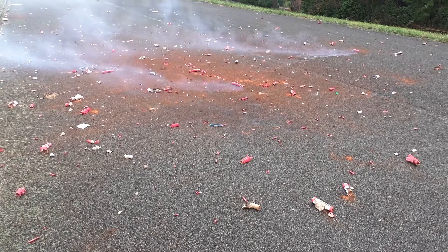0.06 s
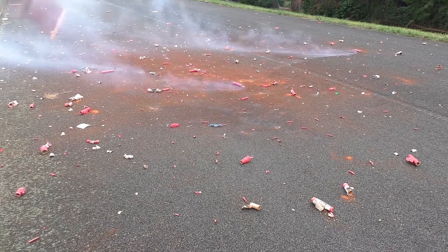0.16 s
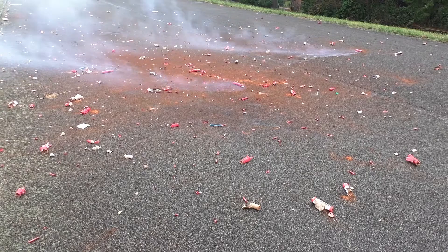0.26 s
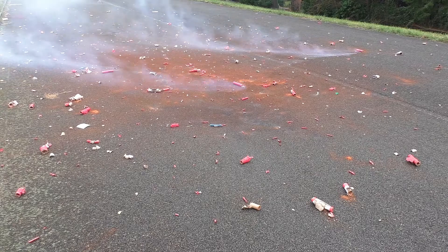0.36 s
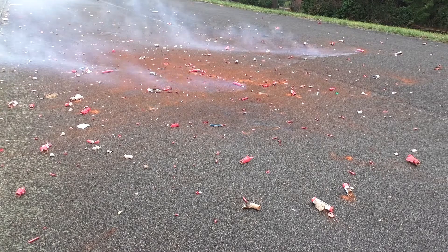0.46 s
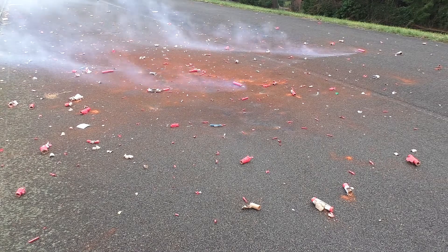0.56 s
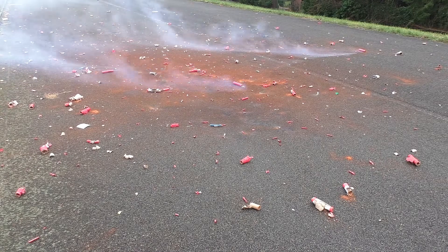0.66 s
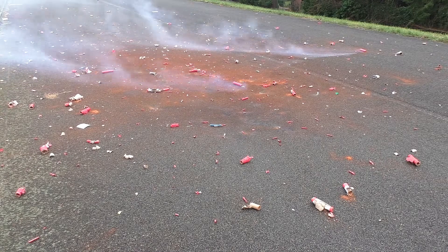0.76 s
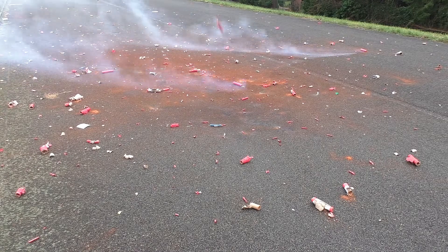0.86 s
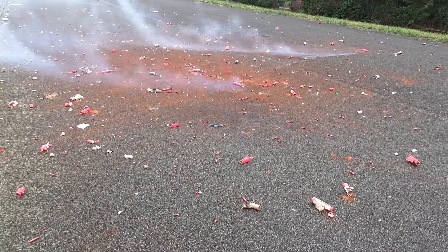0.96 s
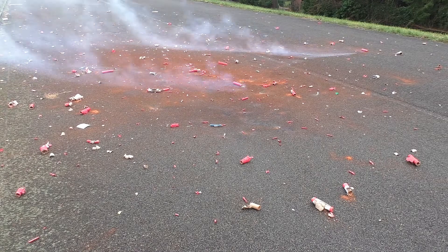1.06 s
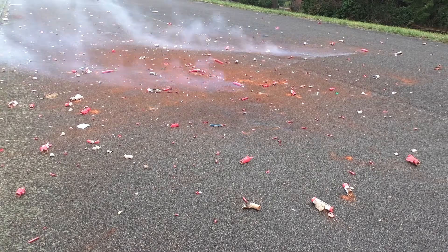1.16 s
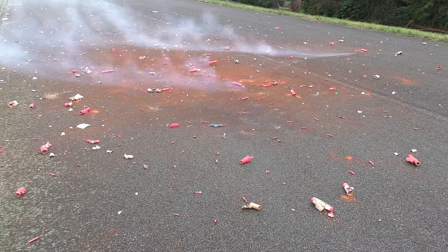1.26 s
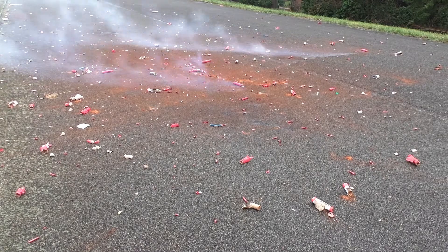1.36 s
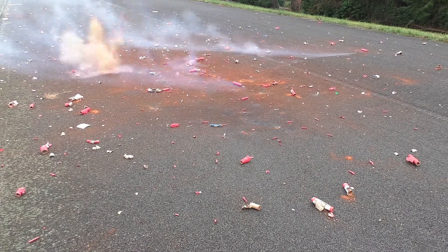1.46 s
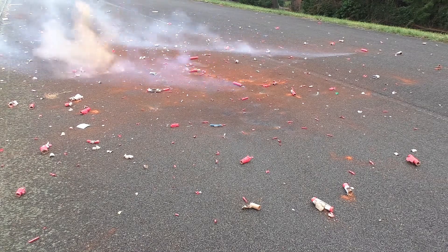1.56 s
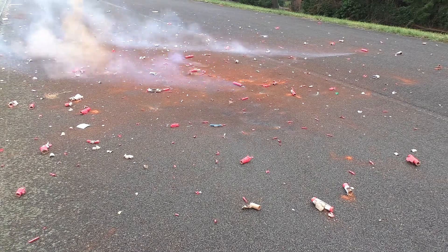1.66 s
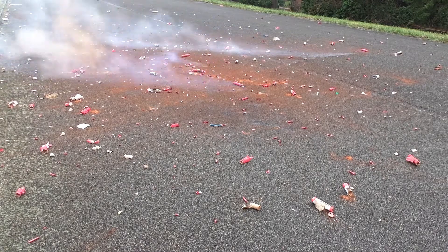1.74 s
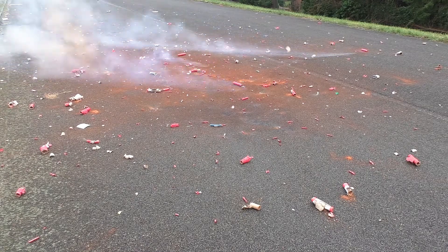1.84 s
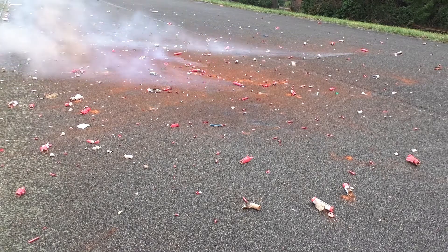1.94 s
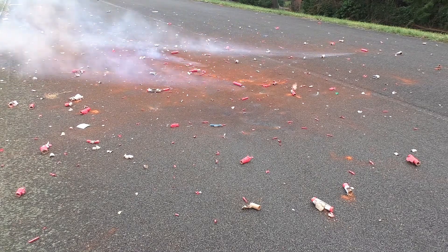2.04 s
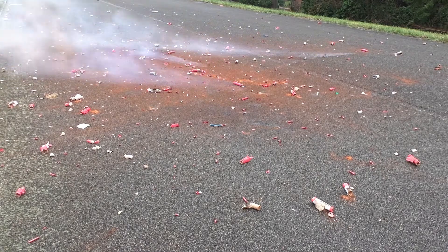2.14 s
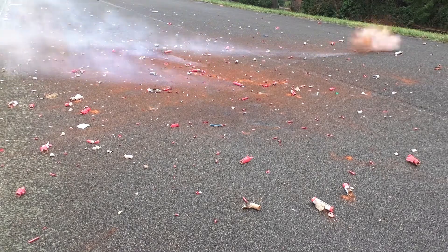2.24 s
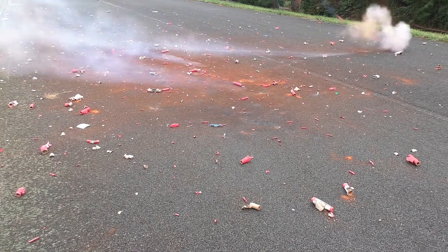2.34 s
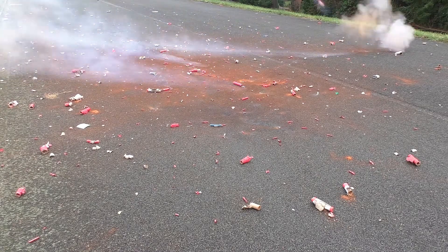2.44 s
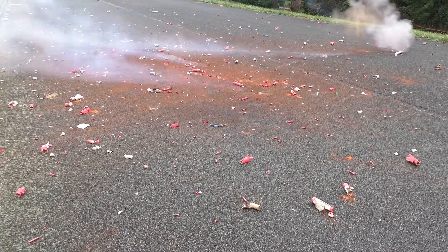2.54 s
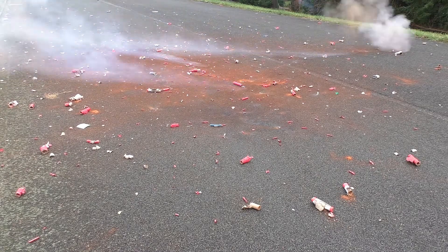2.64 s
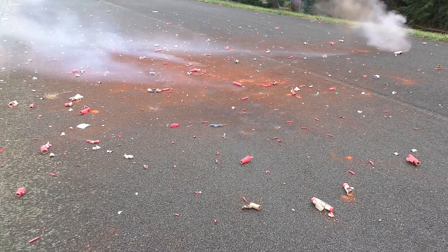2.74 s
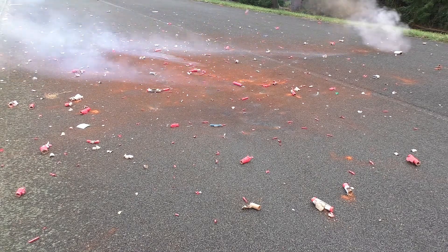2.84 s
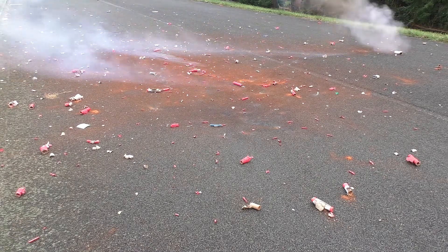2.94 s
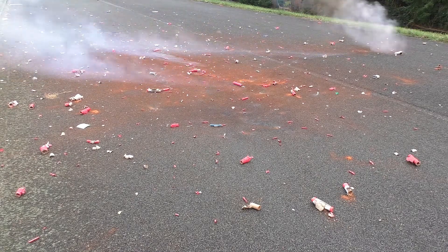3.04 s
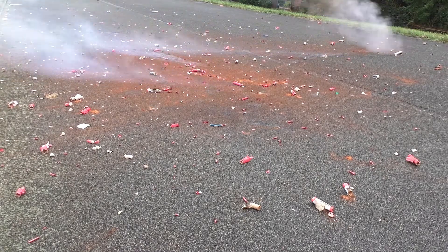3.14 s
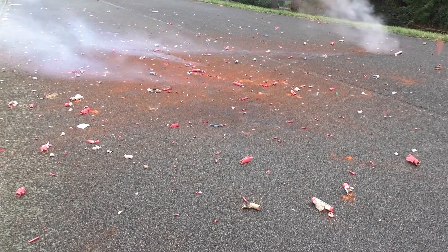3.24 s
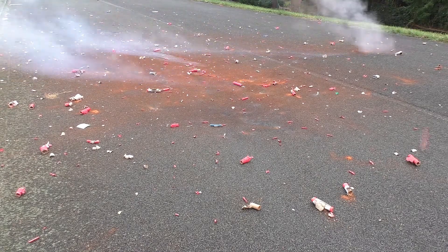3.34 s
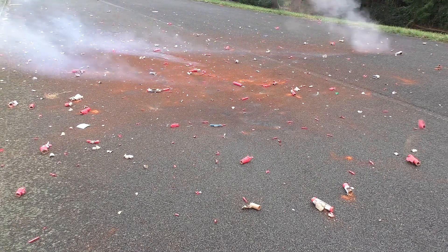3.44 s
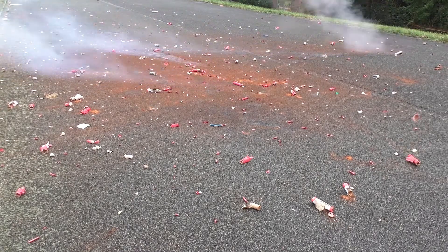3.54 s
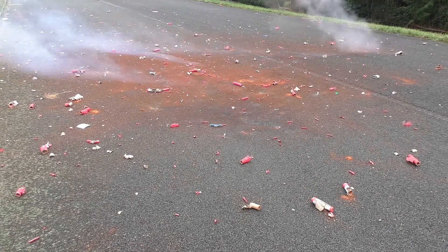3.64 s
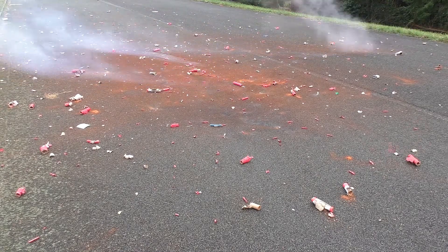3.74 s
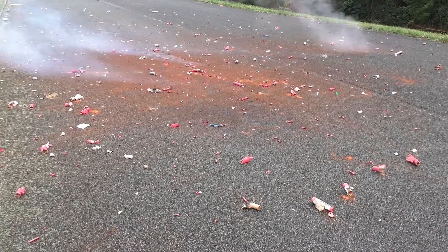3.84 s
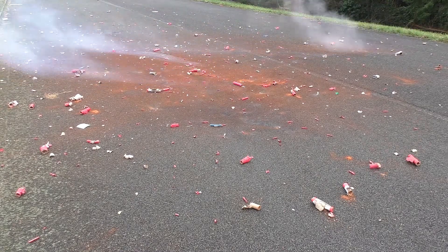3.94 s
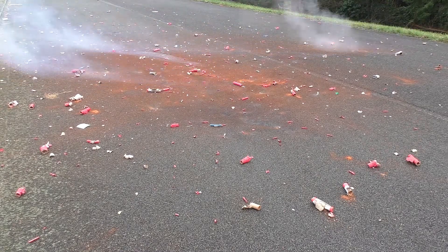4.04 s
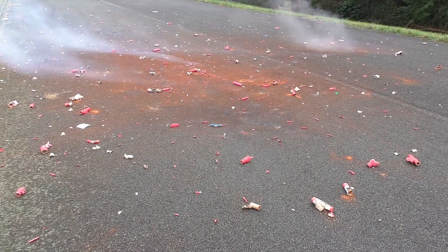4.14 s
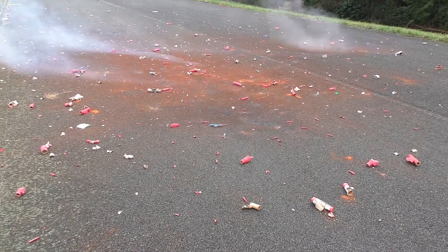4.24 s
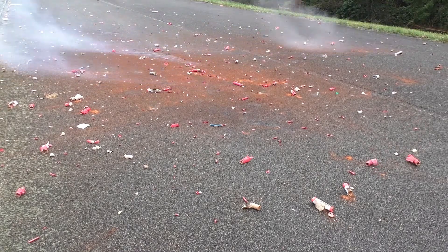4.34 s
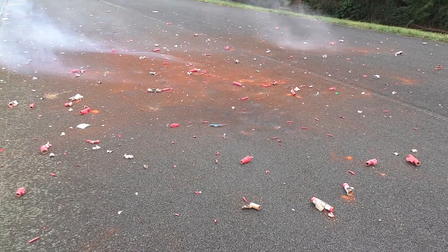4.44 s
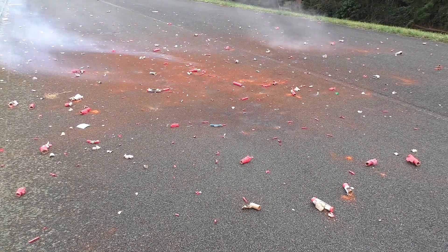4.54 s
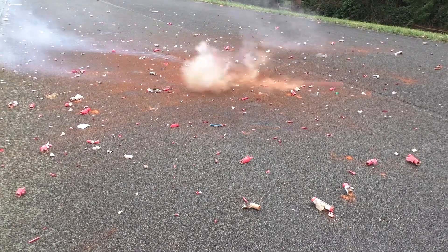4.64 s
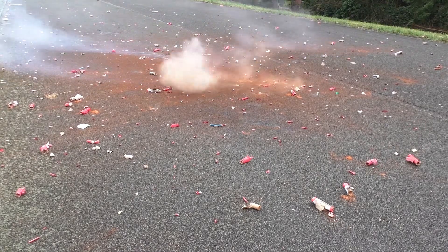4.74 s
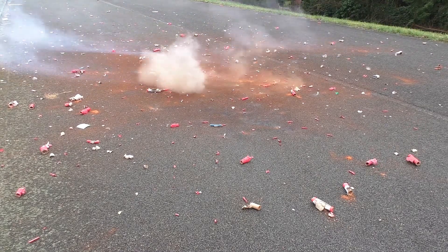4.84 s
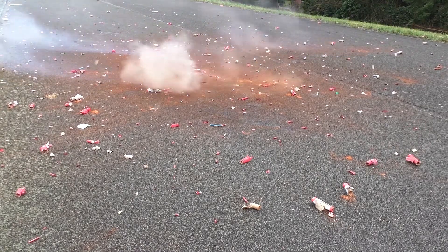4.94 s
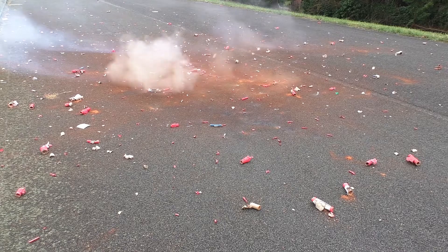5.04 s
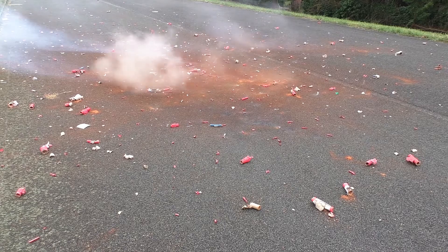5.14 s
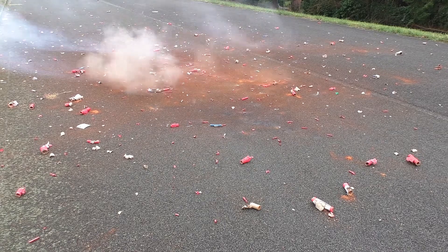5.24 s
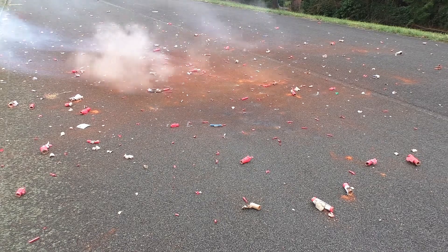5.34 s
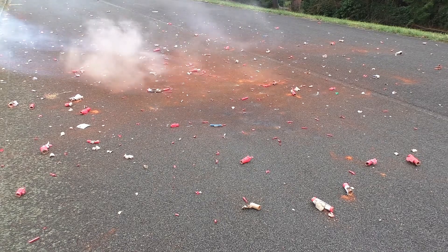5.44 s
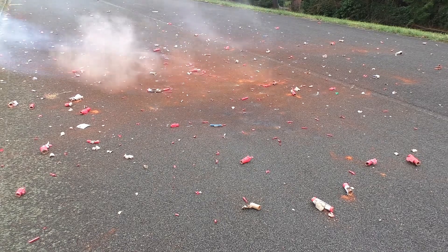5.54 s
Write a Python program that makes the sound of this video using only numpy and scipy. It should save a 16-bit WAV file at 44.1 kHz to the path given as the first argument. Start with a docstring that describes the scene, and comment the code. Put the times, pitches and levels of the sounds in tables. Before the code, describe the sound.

On an open paved lot, a fuse hisses airily with a whistling papery tone, sputtering and fading. Close to a stereo microphone, three firecrackers explode at about 1.4, 2.3 and 4.6 seconds, overloading it. Trees and walls return slaps and a rolling echo. Casing scraps tick on asphalt, and steady distant traffic dips after each bang.

```python
"""Three firecrackers on an open asphalt lot

Three shock fronts go off 5 to 8 m from a pair of microphones and overload them; trees and walls throw each back.
Burning fuses are jets of noise that also ring their paper tubes; pops and falling scraps are clicks with a rattle.
Steady distant traffic is filtered noise; the gain drops at every overload, so the traffic ducks and creeps back.
"""
import sys
import numpy as np
from scipy import signal
from scipy.fft import rfft, irfft, next_fast_len
from scipy.io import wavfile
from scipy.ndimage import map_coordinates

SR = 44100
rng = np.random.default_rng(int(sys.argv[2]) if len(sys.argv) > 2 else 0)


def to_wav(sig):
    """Store sig (one row per channel, or 1-D mono) as 16-bit WAV at the path in sys.argv[1].

    Samples outside -1..1 are clipped; the rate is SR.
    """
    pcm = np.clip(np.atleast_2d(sig), -1, 1) * 32767
    pcm = np.round(pcm).astype(np.int16)
    wavfile.write(sys.argv[1], SR, pcm.T)  # frames by channels


N = 246254  # samples

# The bangs: (time [s], shock level [dB], ground scatter level [dB], microphone swing level [dB],
# swing left over right [dB], echo level [dB], delay of the trees [s])
BANG_EVENTS = [(1.4178, 13.5, -4.5, -2, 16.5, -16.5, 0.11), (2.2527, 16, -1.5, 11, -6.5, -12, 0.09),
               (4.5812, 14, -5, 17, 5.5, -17, 0.1)]
# Spectrum of far, dull reflections: (frequency [Hz], relative density [dB per Hz])
FAR_SPECTRUM = [(40, -5.5), (200, -2.5), (800, 1.5), (1400, -2), (3000, -9), (6000, -20.5), (15000, -47)]


def firecrackers():
    """Each bang radiates a blast, swings the microphones and draws an answer from the trees."""
    out = np.zeros((2, N))
    t = np.arange(SR * 3 // 2) / SR
    for s, shock_db, ground_db, swing_db, lean_db, echo_db, delay in BANG_EVENTS:
        bang = blast(t, shock_db, ground_db)
        overload = amp(swing_db) * pan(lean_db) * swing(t)
        echo = amp(echo_db) * trees(t, delay)
        add(out, s, bang + overload + echo)
    return out


def blast(t, shock_db, ground_db):
    """A shock front, the roar of the bursting tube, then scatter from the asphalt."""
    # spectra: (frequency [Hz], relative density [dB per Hz])
    burst_spectrum = [(40, -2.5), (140, 5), (270, -9.5), (420, -4), (600, -1.5), (1000, 0), (1600, -5.5),
                      (3000, -14), (6000, -19.5), (15000, -30)]
    ground_spectrum = [(40, 4.5), (150, -17.5), (500, -3.5), (900, 1), (1300, -6.5), (2000, -18),
                       (4000, -21.5), (8000, -23), (15000, -30.5)]
    u = t / 0.00053  # pressure turns negative after 0.53 ms
    front = 3.03 * (1 - u) * np.exp(-u)
    # each decays by 60 dB in the time given
    burst = coloured(noise(len(t), width=0.69), burst_spectrum) * amp(-60 * t / 0.057)
    ground = coloured(noise(len(t), width=0.51), ground_spectrum) * amp(-60 * t / 0.23)
    return amp(shock_db) * (front + burst) + amp(ground_db) * ground


def swing(t):
    """The overloaded microphones swing back to rest, each lobe longer and weaker than the last."""
    # still for 6.2 ms, then each lobe ends 2.67 times as late as the one before
    lobes = np.log(np.maximum(t / .0062, 1)) / np.log(2.67)
    decay = np.exp(-(t / 0.35) ** 4) / (1 + (t / 0.015) ** 1.44)
    return -np.sin(np.pi * lobes) * decay


def trees(t, delay):
    """The tree line answers in a crackling swell, and the wood behind it in a long dull roll."""
    # near spectrum: (frequency [Hz], relative density [dB per Hz])
    near_spectrum = [(40, -8.5), (150, -1.5), (420, 0.5), (1000, 4.5), (1600, -3.5), (3000, -6),
                     (6000, -11), (10000, -19), (15000, -32)]
    late = np.maximum(t - delay, 0)
    u = late / 0.052
    swell = u ** 3 * np.exp(3 * (1 - u))
    # the nearest bushes answer first, faintly
    edge = .36 * (1 - np.exp(-late / .006)) * amp(-60 * late / .33)
    crackle = scatter(len(t), rate=350, spread_db=5, width=0.48, dull_hz=3120)
    near = (swell + edge) * coloured(crackle, near_spectrum)
    roll = (1 - np.exp(-u)) * amp(-60 * late / 1.7)
    depths = scatter(len(t), rate=450, spread_db=17, width=0.99, dull_hz=2200)
    far = roll * coloured(depths, FAR_SPECTRUM)
    return near + amp(-12.0) * far


def scatter(size, rate, spread_db, width, dull_hz):
    """Dull reflections from single trunks, on average rate a second, over a wash from the leaves."""
    trunks = (rng.random(size) < rate / SR) * rng.uniform(-1, 1, size)
    sides = amp(spread_db * (rng.random((2, size)) - .5))
    knocks = filtered(unit(trunks * sides), lambda hz: 1 / (1 + (hz / dull_hz) ** 2))
    leaves = noise(size, width) * clumps(size, rate=150, depth_db=3.5)
    return knocks + 0.83 * leaves


def slaps():
    """Walls and trunks around the lot return every bang, late by the detour that the sound takes."""
    # (distance [m], bearing to the right [degrees], level before the common offset [dB re echo],
    # gain per metre that the bang lies to the right [dB/m], pitch [Hz], left over right [dB])
    reflectors = [(22.43, 116, 3, 2, 465, -11), (31.31, -24, 12.5, -.7, 1200, -1.5),
                  (33.92, -45, 8, 0, 850, -4), (48.89, -6, 8.5, 1.1, 890, -10),
                  (73.98, -33, -1, -.9, 930, 1), (80.86, -47, -12, 1.5, 930, -3),
                  (97.4, -20, -16, 1, 1000, -11)]
    # where each bang lies, from the microphones: (to the right [m], ahead [m])
    bang_places = [(-2.73, 4.41), (2.41, 7.21), (1.35, 4.98)]
    sound_m_per_s, offset_db = 343, -2.5
    out = np.zeros((2, N))
    t = np.arange(SR // 8) / SR - .004  # begins 4 ms before the middle of the slap
    for (s, *_, echo_db, _), (right, ahead) in zip(BANG_EVENTS, bang_places):
        place = ahead + 1j * right
        for metres, bearing, db, aim_db, hz, lean_db in reflectors:
            mirrored_microphones = 2 * metres * np.exp(1j * np.radians(bearing))
            detour = abs(mirrored_microphones - place) - abs(place)
            delay = detour / sound_m_per_s
            gain = amp(offset_db + echo_db + db + aim_db * right) * pan(lean_db)
            add(out, s + delay + t[0], gain * slap(t, hz))
    return out


def slap(t, hz):
    """One dull copy of a bang as a short wavelet, with a short rustle."""
    u = 2 * np.pi * hz * t  # phase from the middle of the wavelet
    body = -np.cos(u) * np.exp(-(u / 5.5) ** 2)
    edge = .6 * np.sin(2 * u) * np.exp(-(u / 2.2) ** 2)
    rustle = coloured(noise(len(t), width=0.27), FAR_SPECTRUM) * amp(-60 * (t - t[0]) / 0.14)
    return body + edge + amp(-16.5) * rustle


def ticks():
    """Fuses pop and scraps of casing land on the asphalt: a click, then a short rattle."""
    # fuse pops and larger scraps: (time [s], click level before panning [dB], pitch [Hz],
    # rattle level re click level [dB], time for the rattle to fall 60 dB [s])
    pops_and_landings = [(0.9976, -25.5, 5000, -5, .018), (1.0032, -11.5, 1480, -23.5, .037),
                         (1.227, -26.5, 10000, -10.5, 0.024), (2.522, -19, 2000, -34, .03),
                         (2.881, -33, 4000, -13, .03), (3.123, -31, 1400, -18, 0.03),
                         (3.3806, -6.5, 2490, -33, 0.054), (3.46, -24.5, 1400, -13.5, 0.024),
                         (3.8245, -48, 7440, -5.5, 0.057), (3.867, -51.5, 8550, -4, .21),
                         (4.349, -49, 6500, -13, .017), (4.8634, -12.5, 2280, -33, .016),
                         (4.949, -32, 2980, -32.5, .036), (5.091, -35, 2993, -7.5, 0.067),
                         (5.1345, -32, 5500, -19, .025), (5.32, -35.5, 8540, -14, 0.013),
                         (5.422, -28.5, 8500, -21, 0.035), (5.469, -46, 5500, -8, .036)]
    out = np.zeros((2, N))
    t = np.arange(SR // 6) / SR
    lead = .001  # s of grit ahead of the click
    for s, db, hz, rattle_db, t60 in pops_and_landings + scraps():
        def band(f):
            # small sources radiate almost nothing below 700 Hz
            return (f / hz) ** 1.5 / (1 + (f / hz) ** 3.2) * f ** 4 / (f ** 4 + 700 ** 4)

        impulse = 1. * (np.arange(len(t)) == round(lead * SR))
        click = filtered(impulse, band)
        grit = unit(filtered(noise(len(t), width=0.51), band))
        crack = 0.95 * click / np.abs(click).max() + .25 * grit * np.exp(-np.abs(t - lead) / 0.00037)
        rattle = grit * amp(rattle_db - 60 * t / t60)
        add(out, s - lead, amp(db) * (crack + rattle))
    return pan(-1.5) * out


def scraps():
    """Random landings of small scraps after each bang, as rows like those of the larger scraps."""
    flight_s = (.35, 2.2)  # shortest and longest
    level_db, spread_db, middle_hz = -43, 4, 6000  # level before the fade, its spread either way, pitch
    fade_db_per_s = 3  # the lightest scraps stay up longest
    rows = []
    for s, *_ in BANG_EVENTS:
        for height, size, pitch in rng.random(size=(7, 3)):
            flight = np.interp(height, [0, 1], flight_s)
            db = level_db + spread_db * (2 * size - 1) - fade_db_per_s * flight
            rows.append((s + flight, db, middle_hz * 2 ** (pitch - .5), -12, .035))
    return rows


def fuses():
    """Gas jets flare, sputter and fade; the paper tube rings at its first and third quarter-wave modes."""
    # spells of burning: (start [s], end [s], jet level before flare and boost [dB], tube level [dB],
    # tube pitch at the start [Hz], fade [dB/s])
    spells = [(-0.015, 1.3, -47, -37, 3920, 11), (0.52, 0.837, -57, -44, 3400, 0),
              (1.0, 1.37, -72.5, -43.5, 4300, 4), (1.45, 2.25, -57, -41.5, 3950, 1.5),
              (-.3, 3.56, -59, -49, 3950, 2.5)]
    # jet spectrum: (frequency [Hz], relative density [dB per Hz])
    jet_spectrum = [(300, -3.5), (1200, -6), (2500, 1), (5000, 0.5), (7500, -1), (10000, -6), (13000, -2.5),
                    (16000, -11)]
    # reflection off the asphalt as a tube rocks: (time [s], lowest cancelled frequency [Hz], strength [0-1])
    rocking_tube = [(.8, 3200, 0), (1.02, 4240, 0.1), (1.09, 2900, 0.6), (1.15, 2600, 0.55),
                    (1.21, 3470, 0.4), (1.245, 5360, 0.65), (1.28, 3000, 0), (1.33, 2470, 0.14),
                    (1.45, 3370, 0.1)]
    flare_db, flare_s = 4.5, .2  # height of the flare, and its time after the jet catches
    tube_rise_s, burn_out_s = .22, 0.044  # time constants: the flame enters the tube, the spell dies
    pitch_rise = 0.11  # fraction gained over a spell
    jet_boost_db = 8.0

    tube_noise = noise(N, width=0.18)
    jet_noise = coloured(noise(N, width=0.33), jet_spectrum)
    hz, t, z = signal.stft([tube_noise, jet_noise], SR, nperseg=512)

    def mode(centre, width_hz):
        return 1 / (1 + ((hz[:, None] - centre) / width_hz) ** 2)

    jet_power = tube_power = 0
    for start, end, jet_db, tube_db, tube_hz, fade_db in spells:
        age = np.maximum(t - start, 0)
        burn = (t > start) * amp(-fade_db * age) * np.exp(-np.maximum(t - end, 0) / burn_out_s)
        flare = (age / flare_s * np.exp(1 - age / flare_s)) ** 2
        pitch = tube_hz * (1 + pitch_rise * np.minimum(age / (end - start), 1))
        modes = mode(pitch, width_hz=600) + amp(-17.5) * mode(3 * pitch, width_hz=800)
        entry = 1 - np.exp(-age / tube_rise_s)
        jet_power = jet_power + (burn * amp(jet_db + flare_db * flare)) ** 2
        tube_power = tube_power + (burn * amp(tube_db) * entry * unit(modes)) ** 2

    # direct and ground-reflected hiss cancel in a comb that sweeps as the tube moves
    notch_hz, bounce = curves(rocking_tube, t)
    comb = np.abs(1 + bounce * np.exp(-1j * np.pi * hz[:, None] / notch_hz))

    def sound(spectra, power):
        return signal.istft(spectra * np.sqrt(power) * comb, SR, nperseg=512)[1][:, :N]

    tube = sound(z[0], tube_power) * clumps(N, rate=45, depth_db=2.0)
    jet = sound(z[1], jet_power) * clumps(N, rate=110, depth_db=.8)
    return amp(jet_boost_db) * jet + tube


def traffic():
    """Distant tyres and a low rumble are shaped noise; a narrow wavering band is a faint engine drone."""
    # spectra: (frequency [Hz], relative density [dB per Hz])
    tyre_spectrum = [(100, -10.5), (300, -13.5), (500, -3), (950, 4), (1400, 0.5), (2000, -8),
                     (3000, -18.5), (5000, -31), (9000, -38.5), (16000, -47)]
    rumble_spectrum = [(20, -13.5), (60, 2), (140, 0.5), (220, -4.5), (400, -10), (1000, -71.5)]
    tyres_db, rumble_db, drone_db = -45, -50.5, -56  # before panning
    tyres = coloured(noise(N, width=0.33), tyre_spectrum) * clumps(N, rate=27, depth_db=0.74)
    rumble = coloured(noise(N, width=0.8), rumble_spectrum)
    hum = filtered(rng.standard_normal(N), lambda hz: 1 / (1 + ((hz - 281) / 11) ** 2))
    drone = unit(hum) * clumps(N, rate=4.1, depth_db=2.5)
    mix = amp(tyres_db) * tyres + amp(rumble_db) * rumble + amp(drone_db) * drone
    return pan(-2) * mix


def amp(db):
    """Decibels to gain."""
    return 10 ** (np.asarray(db) / 20)


def unit(x):
    """x at rms 1."""
    return x / np.sqrt(np.mean(x ** 2) + 1e-20)


def pan(db):
    """Left and right gains for a level difference, left over right."""
    return amp([[db / 2], [-db / 2]])


def curves(rows, t):
    """Each column after the time, read at the times t."""
    s, *cols = np.transpose(rows)
    return [np.interp(t, s, c) for c in cols]


def add(track, s, sound):
    """Mix a sound in at time s."""
    part = track[:, round(s * SR):][:, :sound.shape[-1]]
    part += sound[..., :part.shape[1]]


def filtered(x, gain):
    """x times a gain that depends on frequency."""
    m = next_fast_len(x.shape[-1] + 8192)
    spectrum = rfft(x, m) * gain(np.fft.rfftfreq(m, 1 / SR))
    return irfft(spectrum, m)[..., :x.shape[-1]]


def coloured(x, points):
    """x with the spectrum of the (Hz, dB) points, at rms 1."""
    f, db = np.transpose(points)
    return unit(filtered(x, lambda hz: amp(np.interp(np.log(hz + 1), np.log(f), db))))


def noise(size, width):
    """Stereo white noise; width is side over mid in the treble, while long waves reach both microphones alike."""
    mid, side = rng.standard_normal((2, size))
    side = width * filtered(side, lambda hz: (hz / (hz + 1500)) ** 0.17)
    return unit(np.array([mid + side, mid - side]))


def clumps(size, rate, depth_db):
    """A smooth random gain of rms 1 with rate random levels a second."""
    knots = np.clip(rng.standard_normal(int(size * rate / SR) + 4), -2, 2)
    return unit(amp(depth_db * map_coordinates(knots, [np.arange(size) * rate / SR])))


def scene():
    """Everything that reaches the two microphones."""
    return firecrackers() + slaps() + ticks() + fuses() + traffic()


def gain_control(x):
    """The gain drops to 0 dB at every overload and creeps back up at a steady rate."""
    overload_db, recover_db_per_s = 5, 2  # input level that trips it, its recovery
    start_gain_db = 5.5  # already regained at the start
    t = np.arange(N) / SR
    overloaded = np.abs(x).max(axis=0) > amp(overload_db)
    last = np.maximum.accumulate(np.where(overloaded, t, -start_gain_db / recover_db_per_s))
    return x * amp(recover_db_per_s * (t - last))


def record(dry):
    """The bangs duck the gain and saturate the input; almost nothing is kept above the band limit."""
    top_hz = 16100
    x = gain_control(dry)
    clipped = x / (1 + np.abs(x / .97) ** 6) ** (1 / 6)
    return filtered(clipped, lambda hz: 1 / (1 + (hz / top_hz) ** 120))


dry = scene()
out = record(dry)
to_wav(out)
```